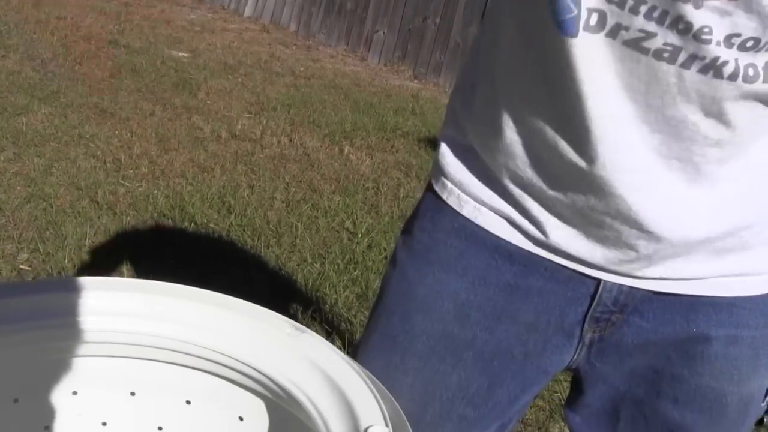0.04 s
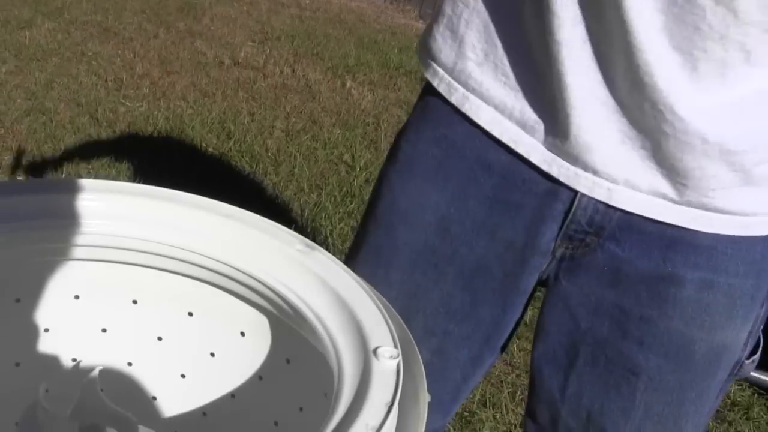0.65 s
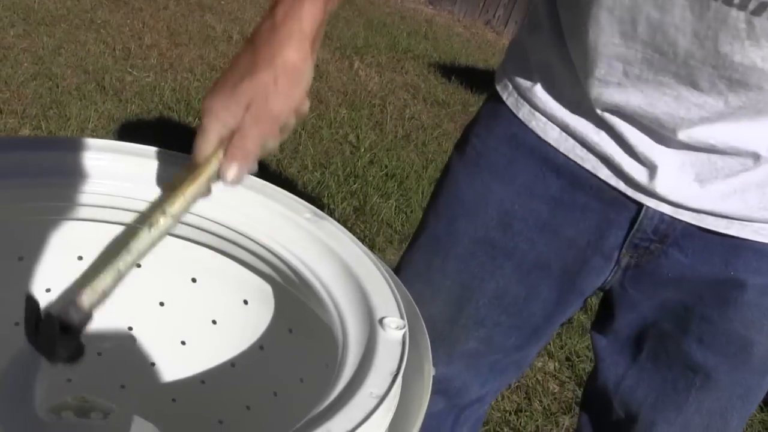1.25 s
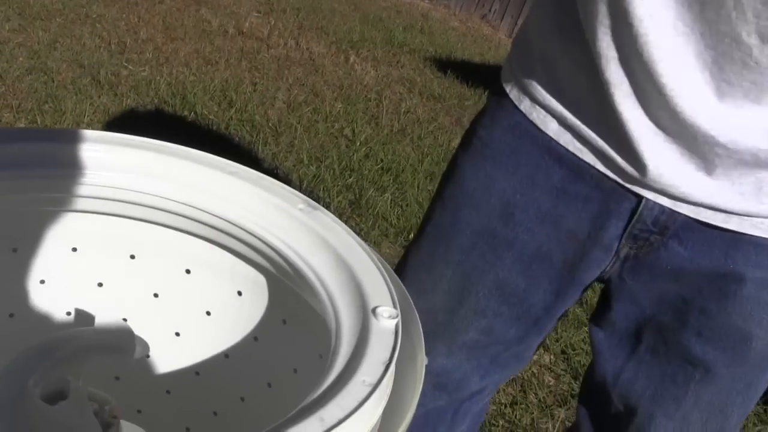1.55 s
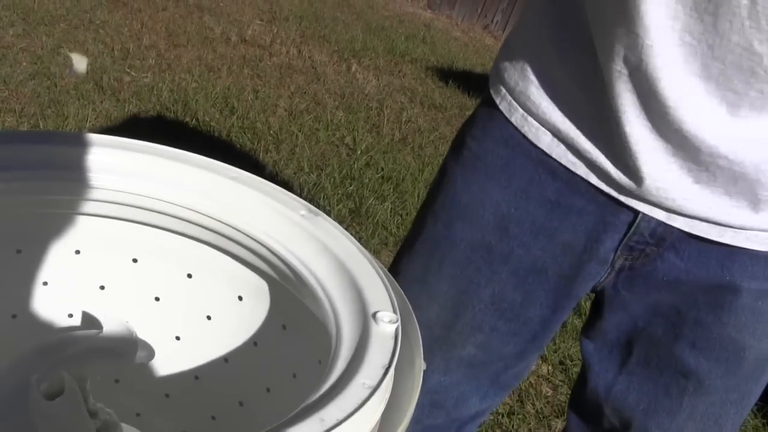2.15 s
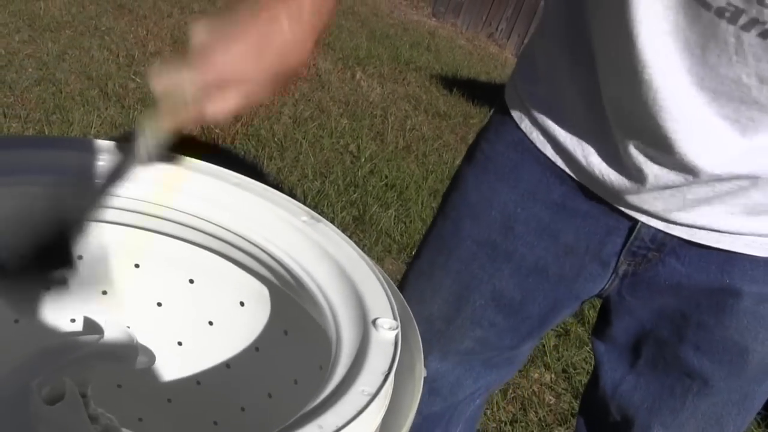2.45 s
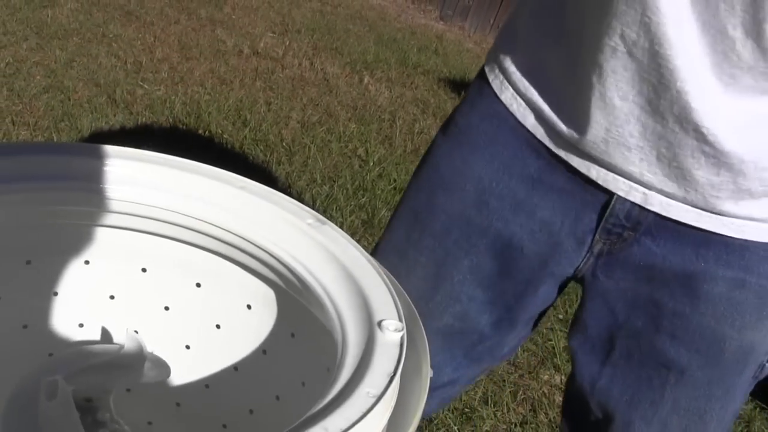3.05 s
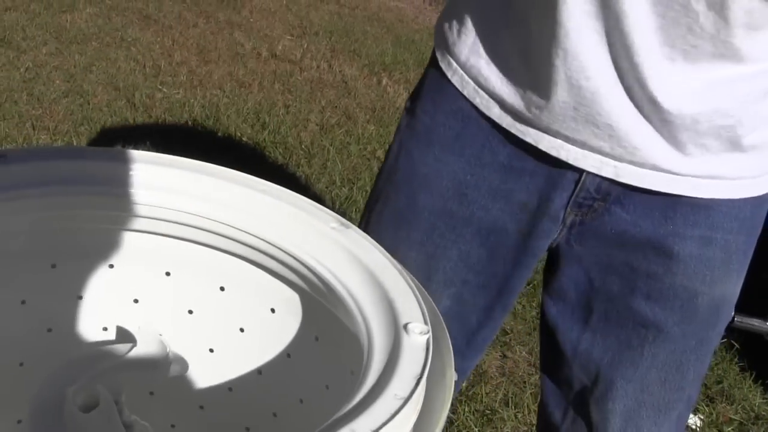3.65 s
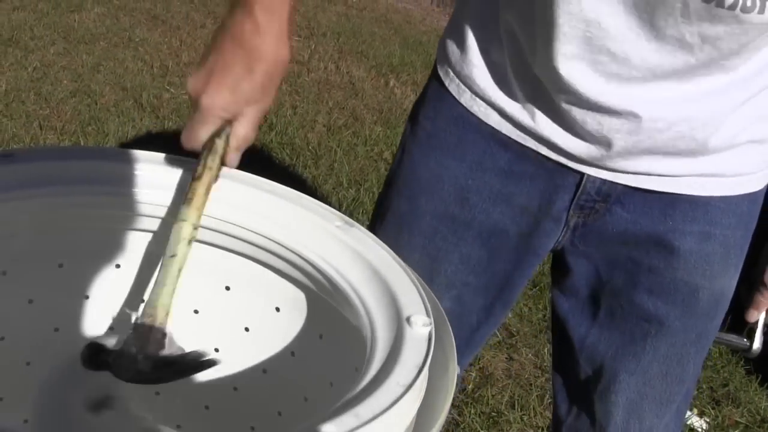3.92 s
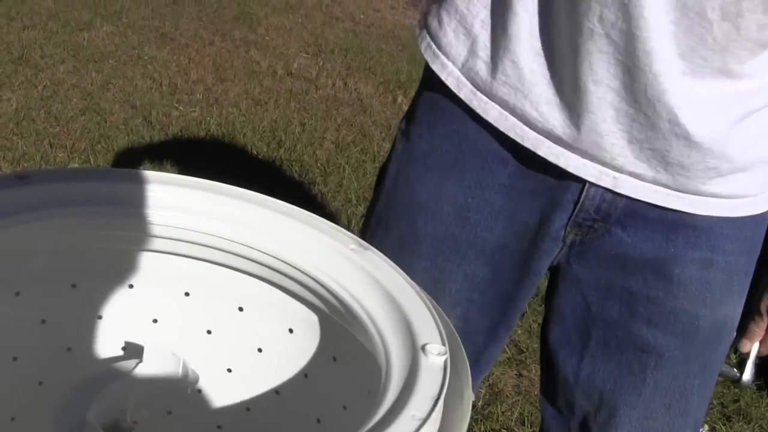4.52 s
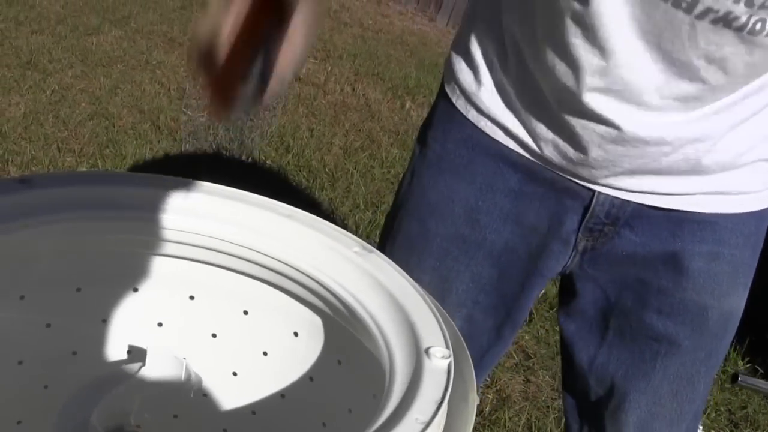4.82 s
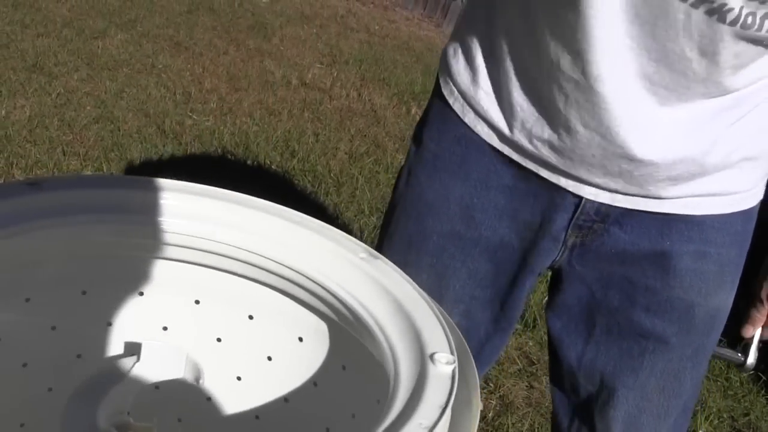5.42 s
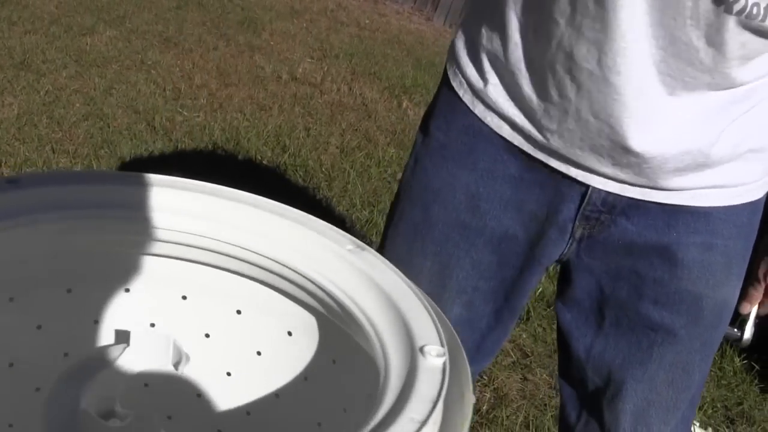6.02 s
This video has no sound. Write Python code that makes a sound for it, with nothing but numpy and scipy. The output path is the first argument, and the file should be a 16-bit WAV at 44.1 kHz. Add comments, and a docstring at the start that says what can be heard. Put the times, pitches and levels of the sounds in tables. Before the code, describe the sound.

Eight crunching hammer blows on plastic set a steel washer drum booming and rocking, while chips bounce and grit rattles between the hits.

```python
"""A hammer smashes the plastic agitator inside a scrapped washing machine on a lawn.
At first the tub is still rocking, grit slides and broken pieces bounce round the steel drum.
From 0.37 s on come eight blows. Each crunches the plastic, sets the tub booming again and sends
chips flying; twice the steel gives a thin ping. The hardest hits overload the close microphone.
After the last blow, at 5.7 s, pieces clatter on. Quiet outdoor air lies under it all."""
import sys
import numpy as np
from scipy import signal
from scipy.fft import rfft, irfft, next_fast_len
from scipy.io import wavfile
from scipy.ndimage import uniform_filter1d

SR = 44100
rng = np.random.default_rng(int(sys.argv[2]) if len(sys.argv) > 2 else 0)


def store_pcm(level_fs):
    """Save levels as 16-bit WAV."""
    pcm = np.round(np.clip(level_fs, -1, 1) * 32767).astype(np.int16)
    wavfile.write(sys.argv[1], SR, np.atleast_2d(pcm).T)


N = 276507
TIME = np.arange(N) / SR

# Thud, knock, clack and snap are the parts of a hit, from low to high.
# Hammer blows: start_s, thud_db, knock_db, clack_db, snap_db, crunch_s, ring_hz, rock_s, rock_db, grit_db
BLOWS = [(0.3662, -21.5, -19, -21, -22, 0.0045, 1600, 0.31, -41.5, -42.5),
         (1.3287, -19.5, -21, -22.5, -26, 0.0082, 1530, 0.25, -36.5, -40.5),
         (1.9843, -30, -19, -21.5, -22, 0.0048, 1960, 0.17, -37, -36.5),
         (2.7044, -25, -23, -21.5, -24.5, 0.0014, 3320, 0.22, -37, -36.5),
         (3.4821, -26.5, -21, -16, -21.5, 0.0012, 1720, 0.24, -34, -34.5),
         (4.127, -23.5, -19.5, -23, -22.5, 0.0025, 2800, 0.2, -35, -35),
         (5.1022, -28.5, -16.5, -21.5, -24.5, 0.00067, 2100, 0.083, -36, -36.5),
         (5.7433, -25.5, -19, -22.5, -26.5, 0.002, 2310, 0.24, -37.5, -41)]
# Pieces and chips, heavy and light, striking the drum: start_s, knock_db, clack_db, snap_db, ring_hz
PIECES = [(0.016, -18, -29.5, -57, 1900), (0.045, -31.5, -36, -60, 1860),
          (0.0638, -21.5, -16.5, -25.5, 2070), (0.151, -19.5, -20.5, -38, 1880),
          (0.225, -28.5, -29, -58, 1740), (0.264, -42, -31.5, -39.5, 2200),
          (0.32, -34.5, -28.5, -39.5, 1900), (0.436, -21.5, -26, -28.5, 2200),
          (0.533, -32.5, -43, -66, 3160), (0.5686, -29.5, -38.5, -46.5, 1970),
          (0.6167, -31.5, -29.5, -43, 2250), (0.6476, -30.5, -54, -70, 1700),
          (0.7274, -39, -42.5, -47, 2900), (0.832, -50, -47, -64, 1870), (1.02, -36.5, -48, -52, 1810),
          (1.053, -38.5, -44, -69, 3000), (1.1434, -48, -51, -76, 2880), (1.698, -64, -65, -41, 3700),
          (1.8023, -50, -77, -50, 2350), (2.0495, -30.5, -27.5, -27.5, 2330),
          (2.2083, -23.5, -18, -24, 3080), (2.2714, -29.5, -45, -64, 1840),
          (2.3079, -31.5, -21.5, -22, 3880), (2.376, -30.5, -23, -19, 2080), (2.478, -26.5, -19, -29, 2640),
          (2.5245, -32, -26, -34.5, 2120), (2.5766, -61, -28, -28, 3420), (2.6235, -36, -24, -30.5, 2400),
          (2.672, -52, -36, -40.5, 2360), (2.8045, -39, -54, -43, 2230), (2.8671, -31, -49, -44.5, 1950),
          (2.8935, -30.5, -28.5, -55, 2260), (2.9383, -34, -38, -62, 2220), (2.986, -32, -56, -70, 1840),
          (3.018, -48, -58, -44.5, 3170), (3.254, -48, -67, -45, 2980), (3.691, -38, -30.5, -38.5, 1650),
          (3.76, -22, -25.5, -26, 2500), (3.8288, -31.5, -62, -67, 2200), (3.8489, -31.5, -36, -40.5, 3350),
          (3.8683, -18.5, -33.5, -30.5, 2000), (4.039, -36, -40.5, -45, 2170),
          (4.1083, -31, -55, -51, 1770), (4.355, -22, -34.5, -38.5, 2410), (4.4379, -23, -40, -42, 1090),
          (4.4544, -23, -44, -29, 2950), (4.4652, -19, -25, -22.5, 3000), (4.6019, -18, -34, -37.5, 1100),
          (4.6435, -24.5, -31, -55, 1250), (4.708, -34.5, -58, -49, 1190),
          (4.7765, -26.5, -62, -50.5, 1070), (4.865, -25, -43.5, -48.5, 1120),
          (4.8825, -27.5, -54, -55, 1070), (4.9518, -34, -49, -46.5, 4020), (5.0828, -31, -56, -50, 1120),
          (5.2104, -30, -26, -33.5, 1600), (5.3062, -22.5, -19, -26, 2030), (5.3599, -22, -23, -27, 2330),
          (5.3814, -17.5, -30, -57, 1130), (5.4495, -18.5, -25, -50, 2290),
          (5.5333, -19.5, -21.5, -60, 2100), (5.6067, -39, -22, -30, 1980), (5.6592, -42, -21.5, -30, 1960),
          (5.9001, -21.5, -31.5, -47, 1930), (5.9933, -17, -26.5, -30, 1840),
          (6.1226, -19.5, -26.5, -34, 3030), (6.1814, -21.5, -45, -46, 1100),
          (6.222, -26, -55, -47.5, 1110)]


def from_db(db):
    """Turn decibels into a gain."""
    return 10 ** (np.asarray(db) / 20)


def rms_one(x):
    """Scale a sound so that its average level (rms) is 1."""
    return x / np.sqrt(np.mean(x ** 2) + 1e-20)


def evened(x, seconds):
    """Hold the running level at 1 and keep the faster detail."""
    power = uniform_filter1d(x ** 2, max(int(seconds * SR), 1))
    return x / np.sqrt(np.abs(power) + 1e-12)


def band(x, low_hz, high_hz):
    """Keep what lies between two frequencies."""
    ripple = 1e-18 * (np.arange(x.shape[-1]) % 3)   # keeps silent tails quick to filter
    sos = signal.butter(2, [low_hz, min(high_hz, .45 * SR)], "band", fs=SR, output="sos")
    return signal.sosfilt(sos, x + ripple)


def coloured(x, spectrum):
    """Shape a steady sound with a smooth tone curve, at level 1."""
    hz, db = np.transpose(spectrum)
    size = next_fast_len(N)
    bins_hz = np.maximum(np.arange(size // 2 + 1) * SR / size, 1)
    gains = from_db(np.interp(np.log(bins_hz), np.log(hz), db))
    return rms_one(irfft(rfft(x, size) * gains, size)[..., :N])


def resonate(x, hz, width_hz):
    """Ring at one pitch; the narrower the width, the longer the ring."""
    r = np.exp(-np.pi * width_hz / SR)
    push = (x - np.r_[0, 0, x[:-2]]) * (1 - r * r) / 2
    return signal.lfilter([1], [1, -2 * r * np.cos(2 * np.pi * hz / SR), r * r], push + 1e-18)


def drift(per_s):
    """A curve that wanders between random values."""
    knots = rng.standard_normal(N // 40)
    return np.interp(TIME * per_s, np.arange(len(knots)), knots)


def add(out, start_s, sound):
    """Mix a sound in at a time, which may lie before the start."""
    start = round(start_s * SR)
    sound, start = sound[max(-start, 0):], max(start, 0)
    out[start:start + len(sound)] += sound[:N - start]


def air(level_db=-48.5):
    """Outdoor air is a quiet, low, steady rush."""
    # Tone of the air: frequency_hz, level_db
    air_tone = [(30, -24), (145, 6.5), (800, -5), (4500, -16.5), (8000, -21), (16000, -26.5)]
    return from_db(level_db) * coloured(rng.standard_normal(N), air_tone)


def spells():
    """Each spell of rocking: start_s, rock_s, rock_db, grit_db."""
    still_rocking = (-0.47, 0.416, -48, -29.5)   # from a blow before the start
    return np.array([still_rocking] + [(row[0], *row[-3:]) for row in BLOWS])


def after_blows(levels_db, jolt_db, settle_db_per_s, jolt_s=0.043):
    """How strongly the tub moves: a jolt at each blow, even rocking, then it settles."""
    power, t = np.zeros(N), TIME[:2 * SR]
    for (start_s, rock_s, _, _), db in zip(spells(), levels_db):
        rocking = from_db(-settle_db_per_s * np.maximum(t - rock_s, 0))
        jolt = from_db(jolt_db) * np.exp(-t / jolt_s)
        add(power, start_s, (from_db(db) * (rocking + jolt)) ** 2)
    return np.sqrt(power)


def after_pieces(levels_db, fade_s):
    """How strongly landing pieces shake the tub; each shake falls 60 dB in fade_s."""
    power, dying = np.zeros(N), from_db(-60 * TIME[:SR] / fade_s)
    for (start_s, *_), db in zip(PIECES, levels_db):
        add(power, start_s, (from_db(db) * dying) ** 2)
    return np.sqrt(power)


def shudder(notes, even_s):
    """Uneven rubbing keeps the tub's notes sounding; the open tub gives off no deep bass."""
    rubbing = band(rng.standard_normal(N + SR), low_hz=91, high_hz=2610)
    ringing = sum((-1) ** k * from_db(db) * resonate(rubbing, hz, width_hz)
                  for k, (hz, width_hz, db) in enumerate(notes))
    return evened(ringing[SR:], even_s)


def tub():
    """The tub booms and rumbles on its springs after each blow, and a little under each heavy knock."""
    # The tub's low and higher notes: pitch_hz, width_hz, level_db
    boom_notes = [(119, 9.8, -1.5), (135.3, 31.6, -6.5), (87, 6.8, -16.5)]
    rumble_notes = [(188, 14.4, -8), (257, 54, 0.5), (293, 22, 4.5), (324.3, 9.3, 4), (424.4, 52, 1.5),
                    (617, 510, -8)]
    rock_db, knock_db = spells()[:, 2], np.array(PIECES)[:, 1]
    boom = np.hypot(after_blows(rock_db - 2.5, jolt_db=0, settle_db_per_s=84),
                    after_pieces(knock_db - 26, fade_s=0.36))
    rumble = np.hypot(after_blows(rock_db + 1, jolt_db=5, settle_db_per_s=72),
                      after_pieces(knock_db - 18, fade_s=0.64))
    return boom * shudder(boom_notes, even_s=0.026) + rumble * shudder(rumble_notes, even_s=0.041)


def drum(x):
    """The drum makes its own notes louder and longer."""
    # Notes of the steel drum: pitch_hz, width_hz, boost_db
    drum_notes = [(288, 102, 12), (450, 41.5, 13.5), (634, 23, 9.5), (750, 21, 6), (846, 13, 6),
                  (1052, 63, 9.5), (1200, 14, 1)]
    for hz, width_hz, boost_db in drum_notes:
        x = x + (from_db(boost_db) - 1) * resonate(x, hz, width_hz)
    return x


def steel_tail(x, fade_s, low_hz=350, high_hz=7000):
    """The many close notes of the steel shell ring on after every hit."""
    tail = band(rng.standard_normal(SR), low_hz, high_hz) * from_db(-60 * TIME[:SR] / fade_s)
    return signal.fftconvolve(x, tail / np.sqrt(np.sum(tail ** 2)))[:N]


def crackle(per_s, size_db, clump_db=1.5):
    """Clicks of uneven size that come in clumps."""
    sizes = from_db(size_db * np.minimum(rng.exponential(1, N), 4)) * rng.choice([-1, 1], N)
    clumps = from_db(clump_db * drift(per_s=80))
    clicks = rng.random(N) < per_s / SR
    return evened(sizes * clumps * clicks, seconds=.1)


def grit(splinter_db=-2):
    """Tiny bits tumble and ring, each at its own pitch; fine splinters tick among them."""
    # Tone of the loose grit: frequency_hz, level_db
    grit_tone = [(400, -15.5), (1100, -3.5), (2200, 0.5), (4200, -8), (6500, -8), (15000, -33)]
    taps = crackle(per_s=700, size_db=1.5)
    pitches_hz = np.geomspace(700, 3600, 14)
    chosen = rng.integers(0, len(pitches_hz), N)
    bits = rms_one(sum(resonate(taps * (chosen == k) + 1e-18, hz, width_hz=134)
                       for k, hz in enumerate(pitches_hz)))
    splinters = rms_one(band(crackle(per_s=280, size_db=4.6), low_hz=3400, high_hz=15000))
    # the drum walls scatter every tick
    splinters = rms_one(splinters + steel_tail(splinters, fade_s=0.0073, low_hz=3000, high_hz=15000))
    return rms_one(drum(coloured(bits + from_db(splinter_db) * splinters, grit_tone)))


def sliding_grit(fitful_db=5.0):
    """Grit slides in fits while the tub rocks and jumps when a piece lands."""
    sliding = after_blows(spells()[:, 3], jolt_db=7, settle_db_per_s=52)
    fits = from_db(fitful_db * drift(per_s=20))
    landing_db = np.array([max(levels_db) for _, *levels_db, _ in PIECES])
    jumping = after_pieces(landing_db - 14, fade_s=0.44)
    return np.hypot(sliding * fits, jumping) * grit()


def hit(bands, levels_db, length_s, ring_hz, ring_db, grain_db, clean_s, rebound=0):
    """A first pulse, a run of tiny cracks or chatters, perhaps a rebound, then echoes in the drum."""
    t = TIME[:SR // 6]
    grains = from_db(grain_db * np.repeat(rng.standard_normal(len(t) // 32 + 1), 32)[:len(t)])
    # a hard contact, with much snap for its clack, reaches further into the treble
    reach = np.ones(len(bands))
    reach[-1] = np.interp(levels_db[-1] - levels_db[-2], [-12, 2], [.8, 1.4])
    # a short, clean contact spends more of its energy in the first milliseconds
    clean = 1 / (1 + length_s / clean_s)
    # a rebounding piece tips over and touches again 5 to 20 ms later
    again = t - rng.uniform(.005, 0.02)
    burst = 0.75 * clean * np.exp(-t / 0.0047) + rebound * (again > 0) * np.exp(-np.abs(again) / 0.0016)
    out = 0
    for k, ((low_hz, high_hz, fade_s, pulse_gain), db) in enumerate(zip(bands, levels_db)):
        envelope = grains * (from_db(-60 * np.maximum(t - length_s, 0) / fade_s) + burst)
        forces = np.array([envelope * rng.standard_normal(len(t)), (t == 0) * (-1.) ** k])
        scatter, pulse = band(forces, low_hz, high_hz * reach[k])
        part = rms_one(scatter) + clean * pulse_gain * rms_one(pulse)
        # the plastic adds a ring of its own
        part = part + (from_db(ring_db) - 1) * resonate(part, ring_hz, width_hz=320)
        out = out + from_db(db) * rms_one(drum(part))
    return out * np.sqrt(SR / 50 / len(t))   # levels count as if the hit lasted 20 ms


def pieces(level_db=3.0):
    """Broken plastic bounces against the drum; light chips clink more purely than heavy pieces."""
    # A landing's knock, clack and snap: low_hz, high_hz, fade_s, pulse_gain
    piece_bands = [(861, 1580, 0.05, 1.7), (1410, 3570, 0.083, 0.85), (4770, 7360, 0.076, 0.96)]
    # A light landing chatters, a hard one is one short contact: level_db, length_s
    contact_lengths = [(-23, 0.0041), (-21, .0022)]
    out = np.zeros(N)
    for start_s, *levels_db, ring_hz in PIECES + chips():
        ring_db = np.interp(max(levels_db), [-42, -25], [22, 6])
        length_s = np.interp(max(levels_db), *np.transpose(contact_lengths))
        landing = hit(piece_bands, levels_db, length_s, ring_hz, ring_db,
                      grain_db=1.5, clean_s=0.0022, rebound=from_db(-12.5))
        add(out, start_s, from_db(level_db) * landing)
    return out


def bumps(rise_s=0.0047):
    """The tub bumps its casing: each soft contact swells and leaves a hollow note."""
    # Bumps on the casing: start_s, pitch_hz, level_db
    casing_bumps = [(0.111, 140, -31.5), (2.121, 302, -24), (2.868, 300, -22.5), (3.286, 410, -33.5),
                    (3.675, 200, -21), (4.04, 450, -29), (4.274, 290, -13.5), (4.961, 440, -24.5),
                    (5.381, 450, -27.5)]
    out, t = np.zeros(N), TIME[:SR // 4]
    swell = t / rise_s * np.exp(1 - t / rise_s)
    for start_s, hz, db in casing_bumps:
        add(out, start_s, from_db(db) * swell * np.sin(2 * np.pi * hz * t))
    return out


def hammer(crack_db=7.0, shove_db=-34, give_db_per_s=1200):
    """Each blow cracks the plastic and shoves the tub; the longer the crunch, the softer the shove."""
    # A blow's thud, knock, clack and snap: low_hz, high_hz, fade_s, pulse_gain
    blow_bands = [(181, 920, 0.11, 0.049), (724, 2300, 0.14, 0.41), (1600, 3500, 0.057, 1),
                  (4370, 8650, 0.091, 0.88)]
    out, t = np.zeros(N), TIME[:SR // 6]
    for start_s, *levels_db, crunch_s, ring_hz, _, _, _ in BLOWS:
        crack = hit(blow_bands, levels_db, crunch_s, ring_hz, ring_db=4.5, grain_db=5.0, clean_s=0.0019)
        shove = rms_one(band(rng.standard_normal(len(t)), low_hz=36.4, high_hz=220))
        shove *= from_db(shove_db - give_db_per_s * crunch_s - 60 * t / 0.036)
        add(out, start_s, from_db(crack_db) * crack + shove)
    return out


def chips(per_blow=5, fade_db_per_s=29, spread_db=5.5):
    """Chips fly from each blow and land at random, the later the weaker; gives rows like PIECES."""
    chip_db = np.array([-35, -44.5, -43])   # knock, clack, snap
    rows = []
    for start_s, *_ in BLOWS:
        for k, (when, pitch, *colour) in enumerate(rng.random((per_blow, 5))):
            flight_s = np.interp(k + when, [0, per_blow], [0.058, 0.65])
            levels_db = chip_db - fade_db_per_s * flight_s + spread_db * (2 * np.array(colour) - 1)
            ring_hz = np.interp(pitch, [0, 1], [1700, 3190])
            rows.append((start_s + flight_s, *levels_db, ring_hz))
    return [row for row in rows if row[0] < TIME[-1]]


def pings():
    """Struck steel rings thinly; its close pitches waver against each other as they die."""
    # Strikes on the steel: start_s, level_db
    steel_strikes = [(.436, -29.5), (2.05, -39)]
    # High notes of the steel: pitch_hz, level_db, fade_s
    steel_notes = [(6336, 0, .5), (6356, -8, .5), (6126, -18, .5)]
    out, t = np.zeros(N), TIME[:SR]
    ring = sum(from_db(db - 60 * t / fade_s) * np.sin(2 * np.pi * hz * t)
               for hz, db, fade_s in steel_notes)
    for start_s, db in steel_strikes:
        add(out, start_s, from_db(db) * ring)
    return out


def microphones(x, lag_samples=0.26, left_db=0.4):
    """Two close microphones: the left is a little nearer and gets more bass; echoes differ slightly."""
    delay = (1 - lag_samples) / (1 + lag_samples)
    right = signal.lfilter([delay, 1], [1, delay], x)   # late by part of a sample
    echoes = from_db(-27) * steel_tail(x, fade_s=0.042, low_hz=200, high_hz=15000)
    bass = from_db(-13) * band(x, low_hz=38.4, high_hz=124)
    side = echoes + bass
    return np.array([from_db(left_db) * x + side, from_db(-left_db) * right - side])


def scene():
    """Blows, bouncing pieces and the rocking tub over quiet outdoor air."""
    hits = hammer() + pieces()
    outdoors = air()
    steel = from_db(-20) * steel_tail(hits, fade_s=0.3) + pings()
    return microphones(hits + steel + tub() + bumps() + sliding_grit() + outdoors)


def record(dry, top_hz=14500, cut_hz=17000):
    """The hardest peaks overload and flatten; the highest treble is softened, then cut off."""
    clipped = dry / (1 + dry ** 8) ** (1 / 8)
    soft = signal.sosfilt(signal.butter(3, top_hz, fs=SR, output="sos"), clipped)
    return signal.sosfilt(signal.cheby2(14, 60, cut_hz, fs=SR, output="sos"), soft)


dry = scene()
out = record(dry)
store_pcm(out)
```